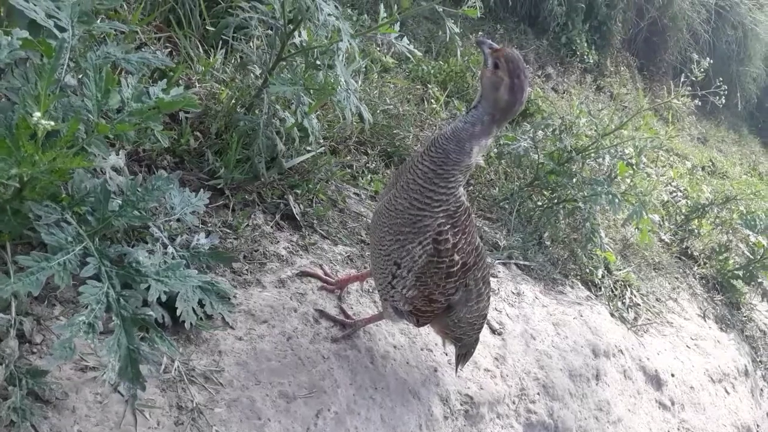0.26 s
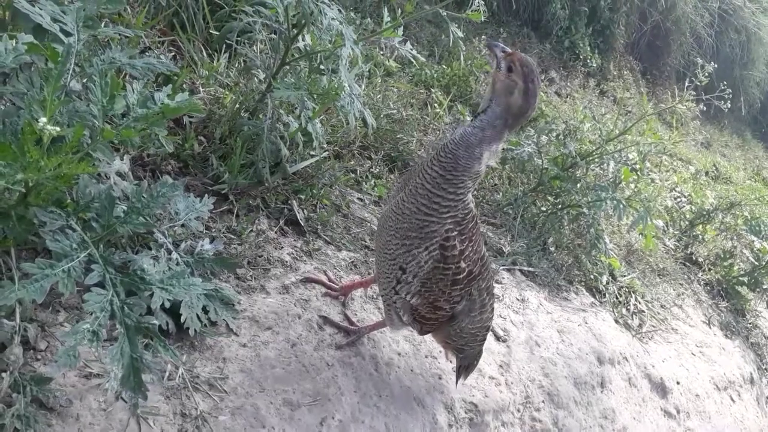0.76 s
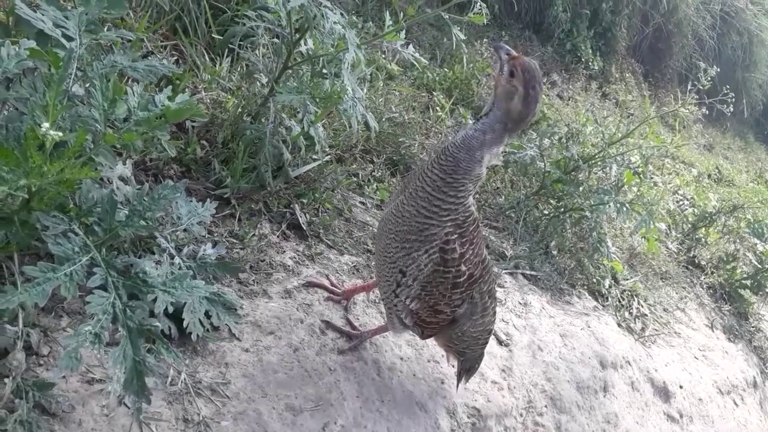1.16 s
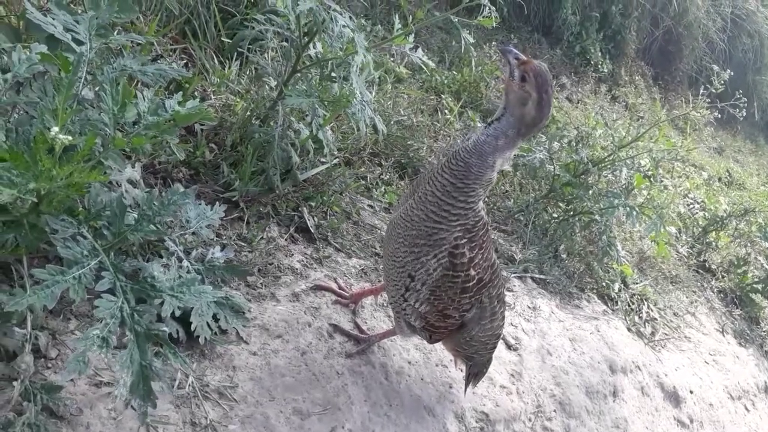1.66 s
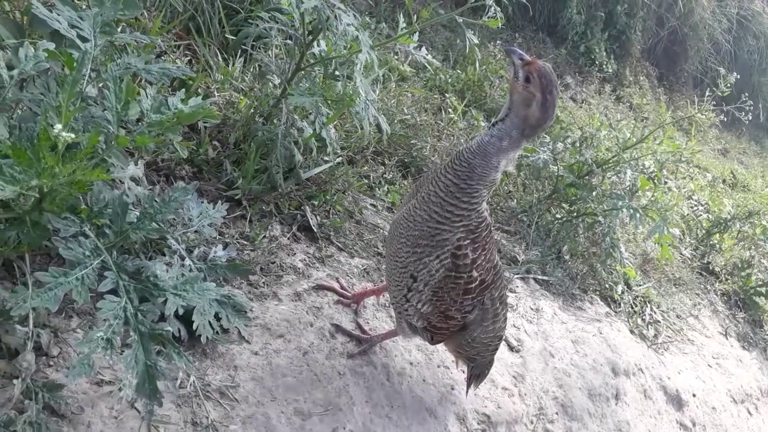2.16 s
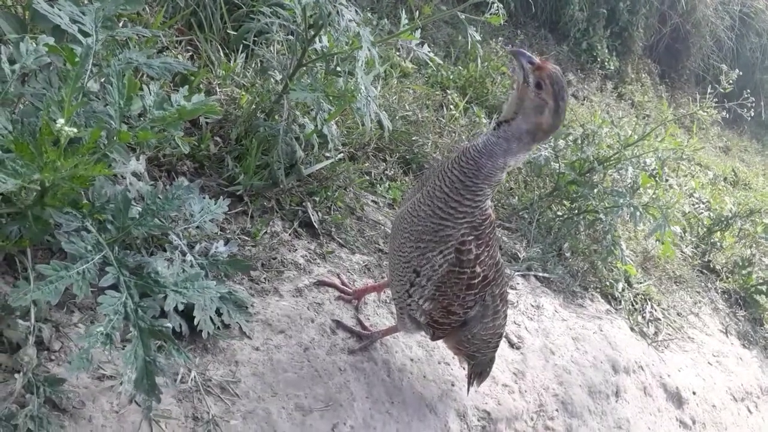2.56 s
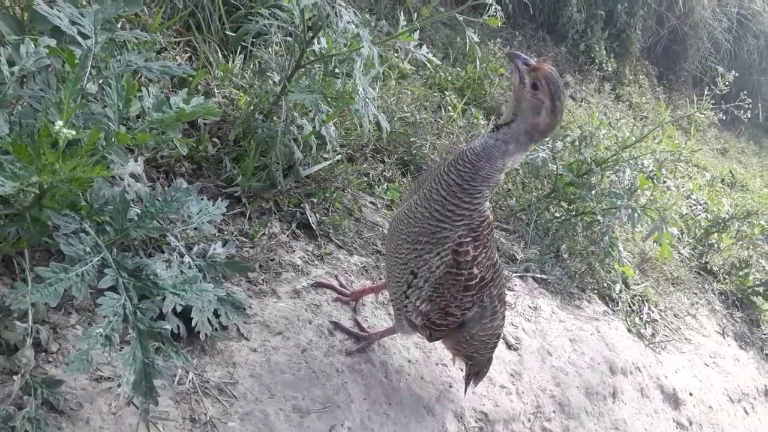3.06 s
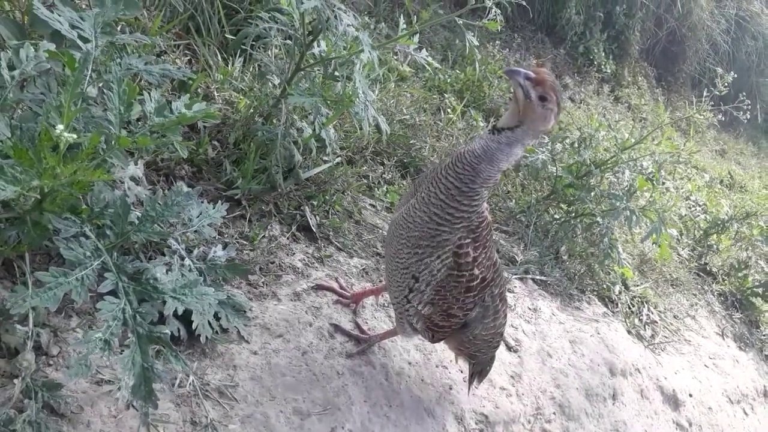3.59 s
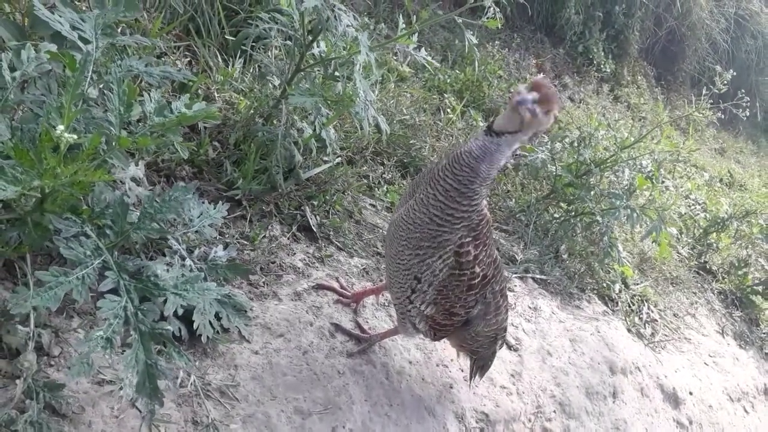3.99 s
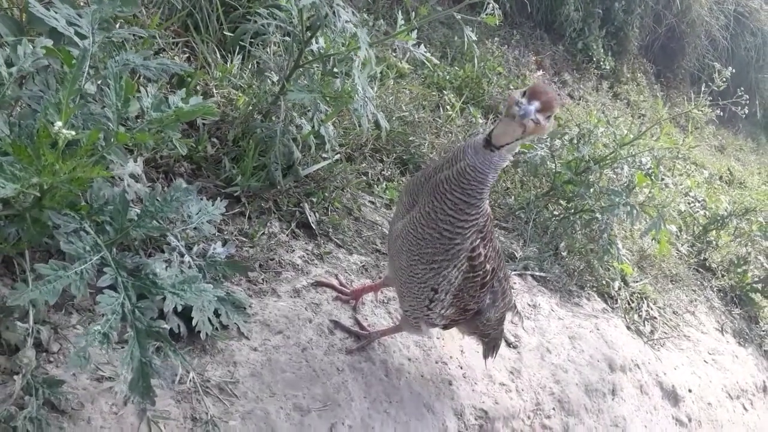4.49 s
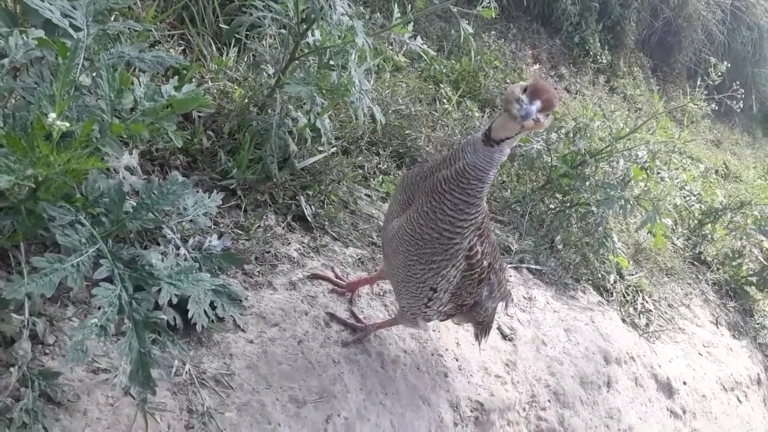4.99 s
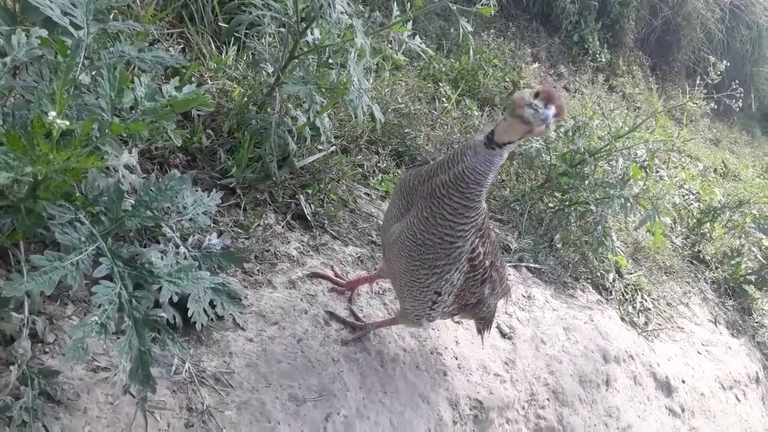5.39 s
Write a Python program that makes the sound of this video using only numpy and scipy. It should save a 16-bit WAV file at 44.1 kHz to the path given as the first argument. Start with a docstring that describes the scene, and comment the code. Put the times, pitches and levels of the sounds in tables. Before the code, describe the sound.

A close, mono outdoor scene, quiet except for one francolin. At 0.5 s it gives a very short, loud note: a few creaky clicks lock into a throaty tone around 1.3 kHz, then creak shut, about a tenth of a second in all, rather muffled. Brighter, open-beaked notes follow at 2.5 and 4.3 s, cracking upward and dropping at the end; the last, at 5.5 s, is highest and ends the scene. Feather flicks give soft low fluttering thumps with dry swishes, strongest at 1.4 and 3.3 s, lighter at 2.4 and 4.1 s, barely heard at 4.6 and 5 s. Faint far whistles near 1.3 kHz sound around 0.8, 1.4 and 2 s, with tiny chirps scattered throughout. A thin insect buzz near 10 kHz continues; rapid 9 kHz trills swell from 0.7 and 3.6 s, each about a second. Low rumble and leaf hiss lie beneath; echoes are short.

```python
"""A francolin calls four times close by on a dry bank: each note creaks open with separate slaps of the
syrinx, locks into a loud periodic tone shaped by the throat, and creaks shut.
Between the notes it flicks its feathers: soft pressure pulses thump and shaped noise swishes.
A modulated noise band buzzes and swept sines trill like insects in the weeds; gliding sines are far birds.
Filtered noise makes a low rumble and a hiss of leaves, and decaying noise echoes the bird."""
import sys
import numpy as np
from scipy import signal
from scipy.fft import rfft, irfft, next_fast_len
from scipy.io import wavfile
from scipy.ndimage import map_coordinates

SR = 44100
rng = np.random.default_rng(int(sys.argv[2]) if len(sys.argv) > 2 else 0)


def generate_wav(sig):
    """Save sig (samples, or channels by samples) to the path in sys.argv[1] as 16-bit PCM at SR."""
    pcm = np.round(np.clip(np.atleast_2d(sig).T, -1, 1) * 32767).astype(np.int16)
    wavfile.write(sys.argv[1], SR, pcm)


N = 248763
TIME = np.arange(N) / SR

# The notes of the call. Each row: start in seconds, opening creak in seconds, tone length in seconds,
# time to the crest of the pitch arch in seconds, crest pitch in Hz before any register break,
# time from crest to the zero of the parabola in seconds, time in the high register in seconds,
# source level of the tone in dB, overtones at the lock in dB, their fading in dB per second,
# beak opening from 0 to 1.
NOTES = [(.535, .0135, .0505, .0165, 1332, .066, 0, -3.5, -3, 30, 0.01),
         (2.4745, .0155, 0.06, .025, 1431, .085, .0112, -3, 0.5, 280, 0.8),
         (4.3128, .012, 0.064, .032, 1457, .09, .0175, -3.5, 0.5, 91.5, .95),
         (5.539, .017, .069, .0325, 1583, .071, .0385, -3.5, 1.5, 20, 1)]


def amp(db):
    """Level law: decibels to amplitude ratio."""
    return 10 ** (np.asarray(db) / 20)


def unit(x):
    """Power normalisation: scale to rms 1."""
    return x / np.sqrt(np.mean(x ** 2) + 1e-20)


def along(points, hz):
    """Logarithmic frequency scale: interpolate (Hz, value) points along it."""
    f, v = np.transpose(points)
    return np.interp(np.log(hz + 1), np.log(f + 1), v)


def wobble(rate):
    """Band-limited fluctuation: a smooth curve through random knots, rate of them a second."""
    return map_coordinates(rng.standard_normal(int(N * rate / SR) + 4), [TIME * rate])


def filtered(x, response):
    """Linear filtering: multiply the spectrum of x by a response of frequency."""
    m = next_fast_len(N + SR // 2)
    return irfft(rfft(x, m) * response(np.fft.rfftfreq(m, 1 / SR)), m)[:N]


def noise(spectrum):
    """Spectral shaping: white noise coloured by (Hz, dB) points, at rms 1."""
    return unit(filtered(rng.standard_normal(N), lambda hz: amp(along(spectrum, hz))))


def ring(spectrum, size=2048):
    """Minimum phase: the folded cepstrum gives the causal impulse response of a spectrum."""
    cepstrum = irfft(np.log(amp(along(spectrum, np.fft.rfftfreq(size, 1 / SR)))))
    cepstrum[1:size // 2] *= 2
    cepstrum[size // 2 + 1:] = 0
    return irfft(np.exp(rfft(cepstrum)))


def swell(s, db, rise, fall):
    """Exponential growth and decay: an envelope that peaks at time s, with time constants in seconds."""
    return amp(db) * np.exp(-np.maximum((s - TIME) / rise, (TIME - s) / fall))


def air(bed_db=-52.5, hiss_db=-69, sway_db=-1.05, leaves_hz=2500):
    """Broadband turbulence: a swaying low rumble, and above it a hiss of leaves that follows the breeze."""
    # Spectrum of the outdoor bed. Each row: frequency in Hz, level in dB.
    bed_spectrum = [(18, -49.5), (30, -19.5), (81, -0.5), (185, -6), (213, -14), (250, -16), (330, -18.5),
                    (415, -21.5), (600, -26), (705, -22.5), (996, -28), (1410, -24.5), (1900, -31),
                    (4890, -33.5), (7400, -33), (9620, -67.5), (16300, -120)]
    # Spectrum of the added hiss. Each row: frequency in Hz, level in dB.
    hiss_spectrum = [(7000, -20), (8000, -3.5), (8800, 5), (11500, 2.5), (12500, -1), (15500, -5.5)]
    # Course of the breeze, used relative to its median. Each row: time in seconds, level in dB.
    breeze_course = [(0, -66.5), (2.4, -65), (5.64, -71)]
    s, db = np.transpose(breeze_course)
    breeze = amp(np.interp(TIME, s, db - np.median(db)))
    bed = amp(bed_db) * noise(bed_spectrum)
    rumble = filtered(bed, lambda hz: 1 / (1 + (hz / leaves_hz) ** 2))
    leaves = bed - rumble + amp(hiss_db) * noise(hiss_spectrum)
    return rumble * amp(sway_db * wobble(4.9)) + breeze * leaves


def buzz(level_db=-64, rate_hz=149.5, depth=.55, drift=0.0067):
    """Amplitude modulation: an insect rasps without pause, a narrow noise band swelling at each wing stroke."""
    # Spectrum of the rasp. Each row: frequency in Hz, level in dB.
    rasp_spectrum = [(8800, -41.5), (9600, -12), (9950, -2), (10400, 0), (10750, -9.5), (11000, -19.5),
                     (12000, -40)]
    phase = 2 * np.pi * np.cumsum(rate_hz * (1 + drift * wobble(2))) / SR
    return amp(level_db) * unit(noise(rasp_spectrum) * (1 + depth * np.cos(phase)))


def far_birds(direct_db=-3, whistle_blur=0.041, chirp_blur=.024, flicker_db=1.7, echo_t60=0.18, echo_db=-6):
    """Frequency modulation and scattering: arched whistles and gliding chirps, blurred by the foliage."""
    # Small birds. Each row: start in seconds, length in seconds, first pitch in Hz, last pitch in Hz,
    # level in dB before direct_db or echo_db.
    chirps = list([(.465, 0.033, 5920, 3400, -52), (1.085, 0.056, 3330, 2980, -61.5),
                   (1.168, .075, 3650, 2830, -52), (1.75, 0.035, 5390, 3800, -57),
                   (2.828, .048, 5700, 4600, -57.5), (5.06, .03, 4510, 5590, -59.5),
                   (5.11, .06, 5740, 4600, -63)])
    # Arched whistles. Each row: start in seconds, length in seconds, top pitch in Hz,
    # level in dB before direct_db or echo_db.
    whistles = [(.801, 0.23, 1318, -58), (1.418, .19, 1300, -54), (1.524, .11, 2270, -62),
                (2.024, 0.2204, 1293, -54.5), (3.62, .11, 2370, -64)]
    sag = 0.017  # share of the pitch lost at both ends of a whistle
    repeat_s, repeat_db = 0.27, -11.5  # each whistle comes again, fainter
    # fainter chirps at random: their mean first pitch, its spread and the fall are shares of pitch
    stray_count, stray_s, stray_hz, stray_spread, stray_fall, stray_db = 6, .04, 4500, 0.25, .2, -71
    waver, flicker = wobble(370), wobble(90)

    def call(start, length, pitches, db, blur):
        """Phase integration: a sine follows a parabola through first, middle and last pitch."""
        note, on = np.zeros(N), (TIME > start) & (TIME < start + length)
        u = (TIME[on] - start) / length
        hz = np.polyval(np.polyfit([0, .5, 1], pitches, 2), u) * (1 + blur * waver[on])
        level = amp(db + flicker_db * flicker[on]) * np.sin(np.pi * u)
        note[on] = level * np.sin(2 * np.pi * np.cumsum(hz) / SR)
        return note

    out = np.zeros(N)
    for s, length, hz, db in whistles:
        arch = hz * np.array([1 - sag, 1, 1 - sag])
        out += call(s, length, arch, db, whistle_blur)
        out += call(s + repeat_s, length, arch, db + repeat_db, whistle_blur)
    for when, pitch in rng.random((stray_count, 2)):
        hz = stray_hz * (1 + stray_spread * (2 * pitch - 1))
        chirps.append((when * N / SR, stray_s, hz, hz * (1 - stray_fall), stray_db))
    for s, length, first_hz, last_hz, db in chirps:
        out += call(s, length, [first_hz, (first_hz + last_hz) / 2, last_hz], db, chirp_blur)
    echo = rng.standard_normal(SR // 2) * amp(-60 * TIME[:SR // 2] / echo_t60)
    echoes = signal.fftconvolve(out, echo / np.linalg.norm(echo))[:N]
    return amp(direct_db) * out + amp(echo_db) * echoes


def creaks(scatter_db=1, unevenness=0.065, spray_db=-11.5, spray_growth=1.2, spray_fall=.002, muffle_db=-4):
    """Impulse excitation: at low pressure separate slaps of the syrinx ring the throat and let out air."""
    # Creaks before and after the tone. Columns: first and last slap level in dB, first and last
    # slap rate in Hz, ring pitch in Hz, spray in dB before spray_db and the muffling.
    opening_creak = (-14, -1.5, 284, 350, 1126.5, -5)
    shutting_creak = (-8.5, -26.5, 233, 189.5, 949.5, -15)
    # Resonances of one slap. Each row: multiple of the ring pitch, level in dB.
    slap_spectrum = [(.11, -34), (.3, -18), (.55, -11.5), (.78, -3), (1, 5), (1.24, -2), (1.85, -15.5),
                     (2.6, -29), (4.7, -43), (7.5, -69)]
    # Spectrum of the short spray of air behind a slap. Each row: frequency in Hz, level in dB.
    spray_spectrum = [(900, -19.5), (1600, 0.5), (2400, 6.5), (3900, -11), (5000, -0.5), (6200, -23.5),
                      (8500, -22), (11300, -12.5), (13000, -20), (15500, -31)]
    overlap_s, shut_s = .004, .021  # the opening creak runs on into the tone
    body, sprays = np.zeros(N + SR), np.zeros(N + SR)
    for onset, opening, tone_s, *_, gape in NOTES:
        before = (onset, opening + overlap_s, opening_creak)
        after = (onset + opening + tone_s, shut_s, shutting_creak)
        for start, length, creak in (before, after):
            first_db, last_db, first_hz, last_hz, ring_hz, bright_db = creak
            slap = ring([(ratio * ring_hz, db) for ratio, db in slap_spectrum])
            slap = slap / np.abs(slap).max()
            puff_db = bright_db + spray_db + muffle_db * (1 - gape)  # a shut beak muffles the spray
            puff = amp(puff_db) * np.exp(-TIME[:len(slap)] / spray_fall)
            t = 0
            for size, delay in rng.standard_normal((12, 2)):  # at most 12 slaps
                if t < length:
                    level = np.interp(t, [0, length], [first_db, last_db]) + scatter_db * size
                    at = round((start + t) * SR)
                    body[at:][:len(slap)] += amp(level) * slap
                    sprays[at:][:len(slap)] += amp(spray_growth * level) * puff  # harder slaps spray more
                t += (1 + unevenness * delay) / np.interp(t, [0, length], [first_hz, last_hz])
    return body[:N] + noise(spray_spectrum) * sprays[:N]


def tones(jitter=.04, shimmer=0.2, rasp_db=-22, rough_rasp_db=-7):
    """Source and filter: the locked syrinx sounds an arched tone, rough at the lock and register breaks."""
    # Throat with the beak wide open, then nearly shut. Each row: frequency in Hz, gain in dB.
    wide_throat = [(150, -33), (550, -20), (1100, -2.5), (1800, 0), (2250, -13), (2950, -13.5), (3500, -14),
                   (4300, -30), (5350, -14), (6150, -48.5), (8600, -30.5), (11700, -21.5), (12600, -39),
                   (15500, -56.5)]
    narrow_throat = [(150, -32), (500, -15), (1100, -1.5), (1500, -0.5), (2200, -16.5), (2800, -23.5),
                     (4000, -31.5), (5200, -15), (6100, -40.5), (8200, -56), (10600, -21), (11800, -50.5),
                     (14600, -36), (15800, -60.5)]
    lowest_hz = 1010.8  # the slack syrinx sings no lower
    attack_s, release_s, lock_db = 0.0093, .002, -10.5  # the tone sets in at lock_db and swells
    # a hard note breaks upward and fades there, then drops to a dull low register just before its end
    high_ratio, high_db, high_fade_db = 1.155, 1.5, 7
    low_ratio, low_db, low_s, low_overtone_db = 0.842, -1, .0095, -6.5
    # overtones fade when the pitch is slack; in the high register they start from flare_db
    full_hz, dull_db_per_hz, flare_db = 1300, 0.13, -1
    steady_rough, lock_rough, break_rough = .05, .9, .7
    lock_settle_s, break_settle_s = .011, .007

    out, flutter, tremor = np.zeros(N + SR), wobble(900), wobble(600)
    rasp = rng.standard_normal(N)
    order = np.arange(2, 14)[:, None]  # overtone numbers
    grid = np.geomspace(100, SR / 2, 300)  # Hz
    for start, opening, length, crest, top_hz, arch, high_s, level_db, overtone_db, fade_db_per_s, gape in NOTES:
        on = (TIME > start + opening) & (TIME < start + opening + length)
        t = TIME[on] - start - opening
        drop = length - low_s
        high = (t > drop - high_s) & (t <= drop)
        low = (t > drop) & (high_s > 0)
        since_break = t - drop + high_s * high

        parabola = 1 - ((t - crest) / arch) ** 2
        hz = np.maximum(top_hz * parabola * high_ratio ** high * low_ratio ** low, lowest_hz)
        db = level_db + lock_db * np.maximum(1 - t / attack_s, 0) + low_db * low
        db[high] += high_db - high_fade_db * since_break[high] / high_s
        bright_db = np.select([high, low], [flare_db, low_overtone_db], overtone_db - fade_db_per_s * t)
        bright_db = bright_db - dull_db_per_hz * np.maximum(full_hz - hz, 0)
        rough = steady_rough + lock_rough * np.exp(-(t / lock_settle_s) ** 2)
        rough += break_rough * (high | low) * np.exp(-(since_break / break_settle_s) ** 2)

        phase = 2 * np.pi * np.cumsum(hz * (1 + jitter * rough * flutter[on])) / SR
        overtones = np.sum(np.cos(order * phase) * (order * hz < SR / 2), axis=0)
        leak = amp(rasp_db) + amp(rough_rasp_db) * rough
        breath = leak * rasp[on] * (1 + np.cos(phase))  # air escapes once a cycle
        fade = np.clip(np.minimum(t, length - t) / release_s, 0, 1)
        level = fade * amp(db) * (1 + shimmer * rough * tremor[on])
        source = level * (np.cos(phase) + amp(bright_db) * overtones + amp(bright_db / 2) * breath)
        throat_db = gape * along(wide_throat, grid) + (1 - gape) * along(narrow_throat, grid)
        sound = signal.fftconvolve(source, ring(np.transpose([grid, throat_db])))
        out[on.argmax():][:len(sound)] += sound
    return out[:N]


def voice(notch_hz=1527.7, notch_width_hz=190, notch_depth=0.71):
    """Destructive interference: near one pitch the voice partly cancels itself on its way out."""
    def notch(f):
        """Resonance subtraction: take a share of a band-pass away from the direct sound."""
        band = 1j * f * notch_width_hz / (notch_hz ** 2 - f ** 2 + 1j * f * notch_width_hz)
        return 1 - notch_depth * band

    return filtered(tones() + creaks(), notch)


def trills(rate_hz=59, sweep_hz=750, peak_share=.35, width=0.9, duty=.7, flicker_db=1.0):
    """Periodic frequency sweeps: each stroke is a tiny falling chirp; pitch and level rise, then hold."""
    # The trill swells twice. Each row: start in seconds, full level in dB.
    trill_starts = [(.69, -55), (3.59, -54.5)]
    length_s, rise_s, rise_db = 0.95, .62, 14
    first_hz, full_hz = 8920, 9370  # pitch at peak_share of the stroke, before and after the rise
    out, t = np.zeros(N + SR), TIME[TIME < length_s]
    effort = np.minimum(t / rise_s, 1)
    stroke = np.minimum(t * rate_hz % 1 / duty, 1)  # a silent gap follows each stroke
    hz = first_hz + (full_hz - first_hz) * effort - sweep_hz * (stroke ** 2 - peak_share ** 2)
    shape = np.sqrt(np.sin(np.pi * stroke)) / (1 + ((stroke - peak_share) / width) ** 2)
    wave = shape * np.sin(2 * np.pi * np.cumsum(hz) / SR)
    for start, db in trill_starts:
        out[round(start * SR):][:len(t)] += amp(db - rise_db * (1 - effort)) * wave
    return out[:N] * amp(flicker_db * wobble(20))


def feathers(grain_db=2.0, flutter_hz=165, unevenness=0.1639, softness=0.00039, rush_db=-17):
    """Pressure pulses and friction: a flick pushes the air in quick beats; vanes swish, then slide back."""
    # Feather flicks. Each row: time in seconds, thump in dB, swish in dB, rise in seconds,
    # fall in seconds, delay of the slide back in seconds, slide in dB.
    flicks = [(1.410, -15.5, -36.5, .0045, .009, 0.031, -41), (2.172, -59, -56, .004, .01, .055, -60.5),
              (2.366, -44, -42.5, 0.012, .015, .055, -50.5), (2.391, -32.5, -47.5, .001, .004, .01, -54.5),
              (3.3441, -18, -38, 0.0076, 0.0072, .030, -41), (4.114, -29, -40, 0.0011, 0.014, .034, -46.5),
              (4.602, -45.5, -62, 0.0025, .008, .06, -67), (4.97, -49.5, -68.5, .03, .033, .03, -70.5)]
    # Spectrum of one push. Each row: frequency in Hz, level in dB.
    thump_spectrum = [(60, -26.5), (150, -11), (260, -1), (450, 0), (650, -12), (1000, -20.5), (1450, -14),
                      (3000, -43.5), (8000, -80)]
    # Spectrum of vanes rubbing. Each row: frequency in Hz, level in dB.
    vane_spectrum = [(410, -31.5), (700, -1.5), (1010, -8.5), (1290, -3), (1790, -9), (3180, -1),
                     (4520, -5), (7130, -0.5), (8120, -7.5), (12000, -4.5), (15800, -14.5)]
    # Spectrum of the air rushing out of the plumage. Each row: frequency in Hz, level in dB.
    rush_spectrum = [(400, -32), (900, -4.5), (1450, -0.5), (2100, -3.5), (3500, 0.5), (4600, -13),
                     (6500, -11.5), (12000, -27)]
    slide_rise_s, slide_fall_s = 0.0067, 0.019
    # a faint swell of the same swish noise rises and falls evenly round each flick
    faint_db, faint_s = -18.5, .065
    pushes, gusts, sliding = np.zeros((3, N))
    beats = np.arange(-3, 6)
    for s, thump_db, swish_db, rise, fall, delay, slide_db in flicks:
        slip = unevenness * rng.standard_normal(len(beats)) * (beats != 0)  # the main beat is on time
        at = np.round((s + (beats + slip) / flutter_hz) * SR).astype(int)
        pushes[at] += swell(s, thump_db, rise, fall)[at]
        gusts += swell(s, thump_db + rush_db, rise, fall / 2)
        sliding += swell(s, swish_db, rise, fall)
        sliding += swell(s + delay, slide_db, slide_rise_s, slide_fall_s)
        sliding += swell(s, swish_db + faint_db, faint_s, faint_s)
    thud = ring(thump_spectrum)
    thud = thud * (1 - np.exp(-TIME[:len(thud)] / softness))  # down yields, so the push starts softly
    puffs = signal.fftconvolve(pushes, thud / np.abs(thud).max())[:N]
    vanes = unit(noise(vane_spectrum) * amp(grain_db * wobble(700)))
    return puffs + gusts * noise(rush_spectrum) + sliding * vanes


def surroundings(x, near_t60=0.069, far_db=-37):
    """Scattering and reverberation: the weeds return the treble at once; the bank adds a faint tail."""
    # Decay of the bank's tail. Each row: frequency in Hz, time to fall 60 dB in seconds.
    bank_decay = [(200, .12), (900, 0.14), (1450, 0.31), (2000, .2), (3000, .32), (5300, .28),
                  (14000, 0.09)]
    # What the weeds throw back. Each row: frequency in Hz, gain in dB.
    weed_spectrum = [(200, -29), (1400, -28), (2800, -18), (5000, -15.5), (11000, -13), (15000, -13.5)]
    hz, t, z = signal.stft(rng.standard_normal(SR // 2), SR, nperseg=256)
    tail = signal.istft(z * amp(-60 * t / along(bank_decay, hz)[:, None]), SR, nperseg=256)[1]
    scatter = rng.standard_normal(len(tail)) * amp(-60 * TIME[:len(tail)] / near_t60)
    near = signal.fftconvolve(scatter / np.linalg.norm(scatter), ring(weed_spectrum))[:len(tail)]
    return signal.fftconvolve(x, near + amp(far_db) * tail / np.linalg.norm(tail))[:N]


def scene():
    """Superposition: the bird close by and its echoes add to the field behind it."""
    bird = voice() + feathers()
    return (bird + surroundings(bird) + far_birds() + trills() + buzz() + air())[None]


def record(dry, ceiling=.97, top_hz=15830):
    """Saturation and band limiting: the highest peaks are rounded off and nothing passes above top_hz."""
    rounded = dry[0] / (1 + (dry[0] / ceiling) ** 12) ** (1 / 12)
    return filtered(rounded, lambda hz: hz < top_hz)[None]


dry = scene()
out = record(dry)
generate_wav(out)
```